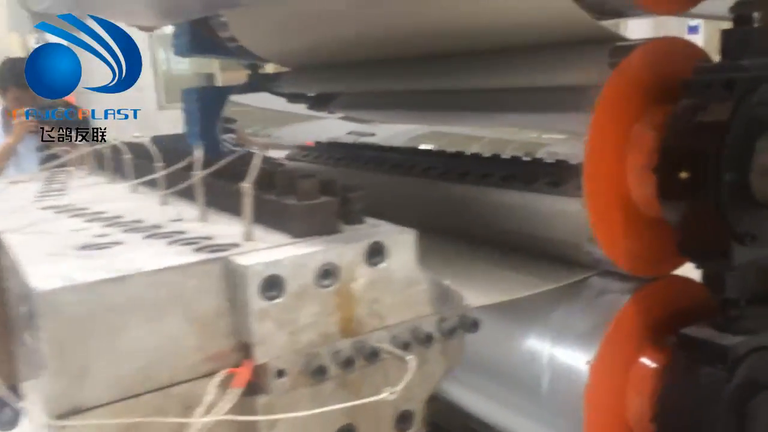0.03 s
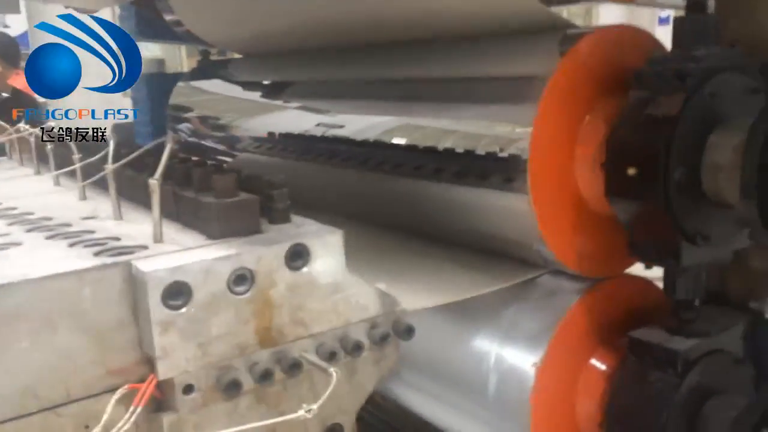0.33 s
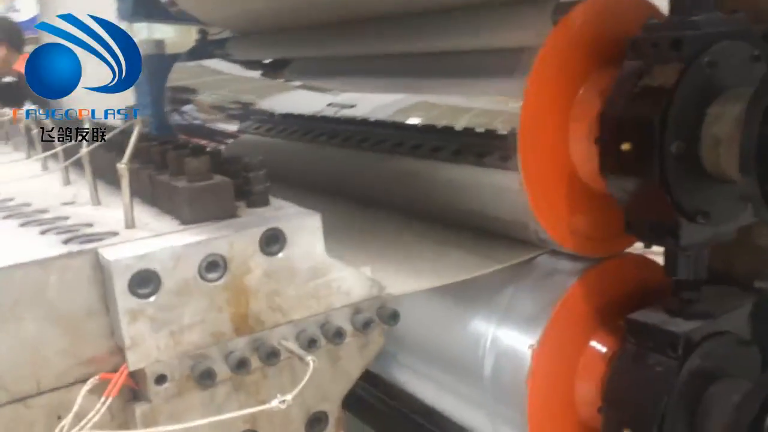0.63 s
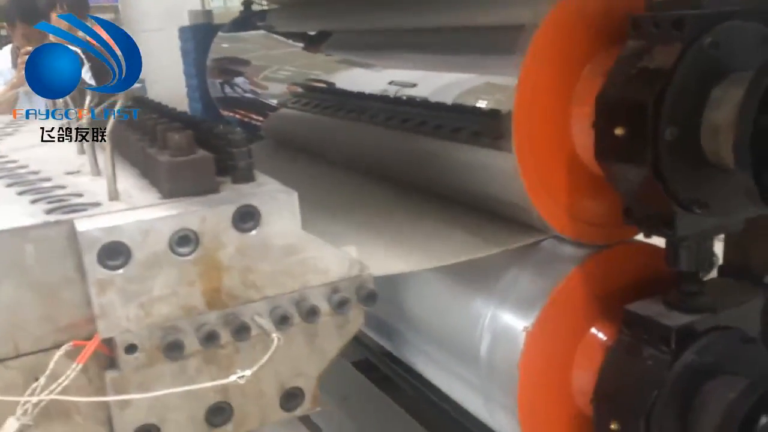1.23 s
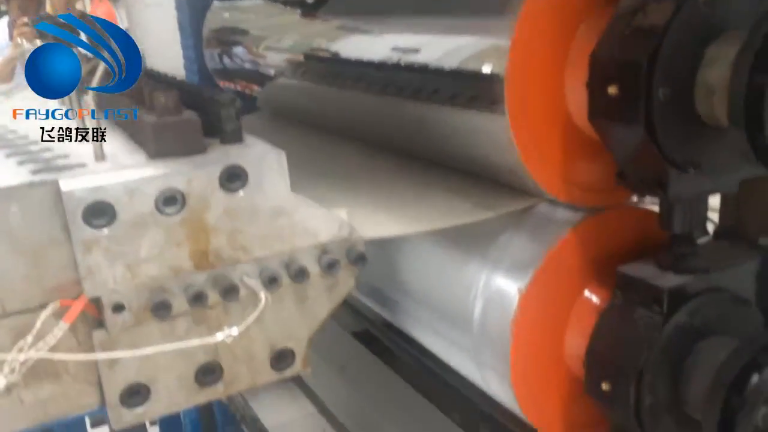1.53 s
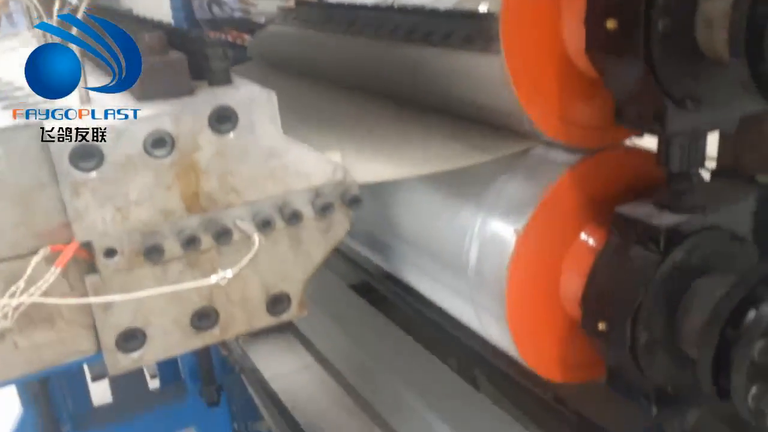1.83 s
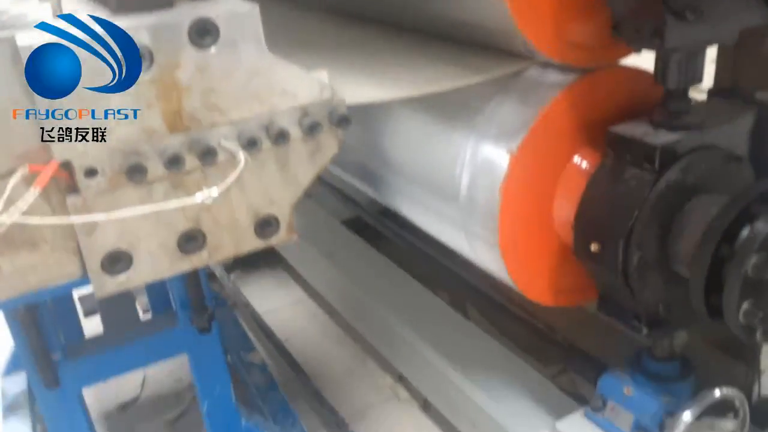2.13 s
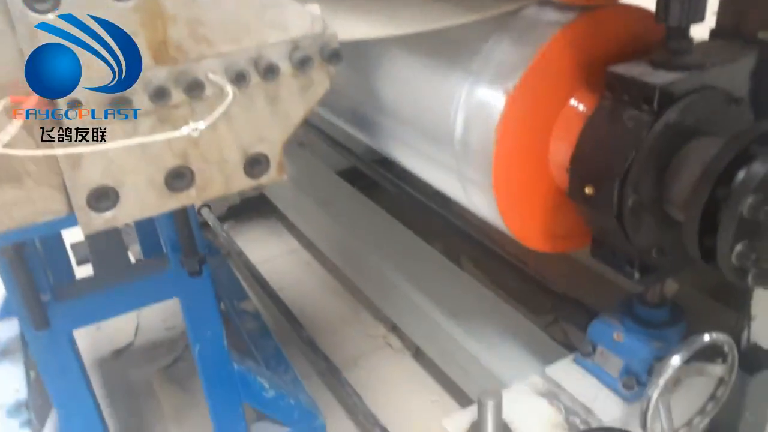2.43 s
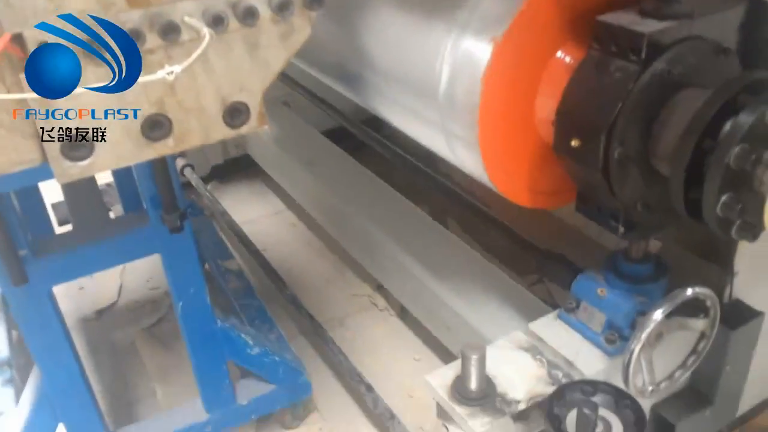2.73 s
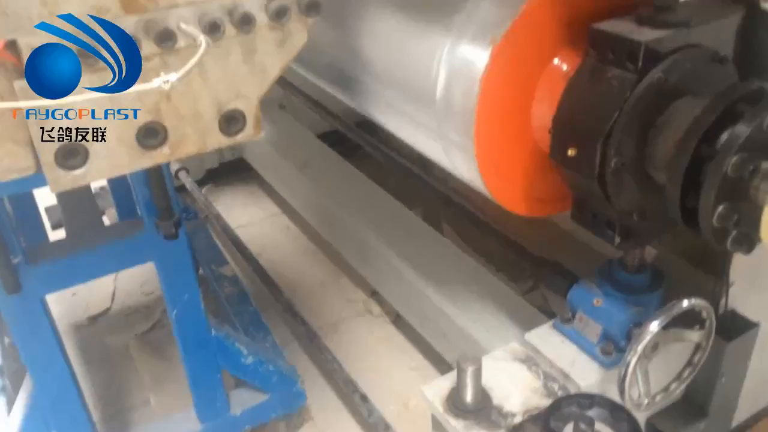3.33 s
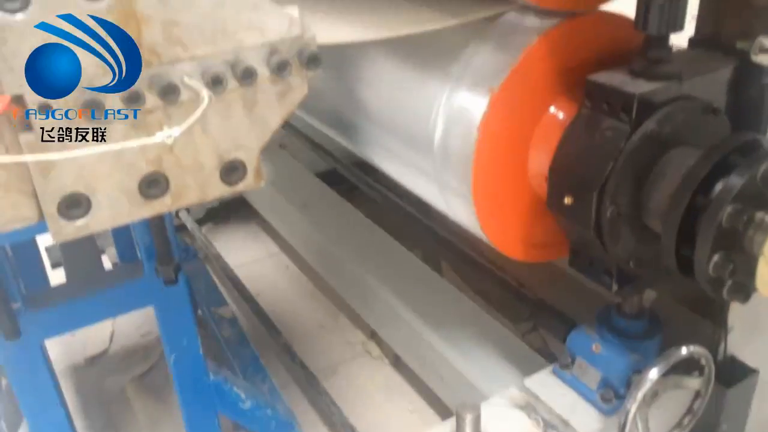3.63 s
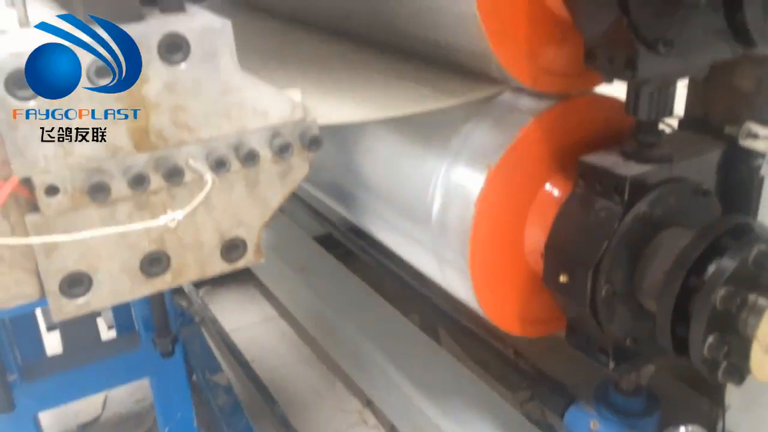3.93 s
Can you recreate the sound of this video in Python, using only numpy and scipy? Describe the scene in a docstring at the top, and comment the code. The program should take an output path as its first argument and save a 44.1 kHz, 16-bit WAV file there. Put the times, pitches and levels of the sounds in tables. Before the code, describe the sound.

Steady drone of a plastic sheet rolling machine, with whirring gears and two knocks.

```python
"""A steady factory rush with humming motors, whirring gears and a thin drive whine near 4 kHz.
It is a plastic sheet extrusion line with its fans and rolls. The microphone tilts from the roll gap
down to the frame, so hum and whirr grow and the tones swell and fade in the hall's standing waves.
Halfway through, a light clack and a harder, briefly rattling knock come from the machinery."""
import sys
import numpy as np
from scipy import signal
from scipy.fft import rfft, irfft
from scipy.io import wavfile

SR = 44100
rng = np.random.default_rng(int(sys.argv[2]) if len(sys.argv) > 2 else 0)


def master_out(mix):
    """Clip the mix to full scale and print it as 16-bit PCM to the path in sys.argv[1]."""
    frames = np.transpose(np.atleast_2d(mix))
    ceiling = np.clip(frames, -1, 1)
    pcm = np.round(ceiling * 32767).astype(np.int16)
    wavfile.write(sys.argv[1], SR, pcm)


N = 176400


def from_db(db):
    """Decibels to gain."""
    return 10 ** (np.asarray(db) / 20)


def unit_rms(x):
    """Scale to rms 1."""
    return x / np.sqrt(np.mean(x ** 2) + 1e-20)


def curve(rows):
    """Interpolate (time [s], value) rows at every sample."""
    return np.interp(np.arange(N) / SR, *np.transpose(rows))


def bell(centre_s, width_s):
    """Gaussian swell of height 1."""
    return np.exp(-((np.arange(N) / SR - centre_s) / width_s) ** 2)


def drift(rate_hz):
    """Smooth random fluctuation, rms 1."""
    hop, settle = 100, 2000
    pole = np.exp(-2 * np.pi * rate_hz * hop / SR)
    white = rng.standard_normal(N // hop + settle + 2)
    slow = signal.lfilter([1], [1, -2 * pole, pole * pole], white)[settle:]
    return np.interp(np.arange(N) / hop, np.arange(len(slow)), unit_rms(slow - slow.mean()))


def noise(spectrum, side_db=-14):
    """Coloured noise, nearly alike in both channels, rms 1."""
    hz, db = np.transpose(spectrum)
    bin_hz = np.maximum(np.arange(N // 2 + 1) * SR / N, 1)
    gain = from_db(np.interp(np.log(bin_hz), np.log(hz), db))
    gain /= np.sqrt(1 + (bin_hz / (2 * hz[-1])) ** 4)  # low-pass
    gain *= bin_hz / (bin_hz + 10)  # high-pass
    mid, side = irfft(rfft(rng.standard_normal((2, N))) * gain, N)
    return unit_rms(mid + from_db(side_db) * side * [[1], [-1]])


def tone(hz, wander_hz, fade_db, fade_hz, side_db=-33.5):
    """Wandering, fading sine plus a weak reflection that differs between channels, rms 1."""
    phase = 2 * np.pi * (np.cumsum(hz + wander_hz * drift(6.36)) / SR + rng.random())
    side = from_db(side_db) * drift(0.93) * np.cos(phase + 2 * np.pi * rng.random())
    fade = from_db(fade_db * drift(fade_hz))
    return unit_rms(fade * (np.sin(phase) + side * [[1], [-1]]))


def fans():
    """Steady broadband rush of air."""
    # rush spectrum (frequency [Hz], relative density [dB])
    spectrum = [(22, -9.5), (34, -20), (48, 1.5), (70, -6.5), (95, -6.5), (125, -3.5), (190, 1), (250, -1),
                (330, -1), (440, 1.5), (540, -5), (700, -2.5), (950, -1), (1400, -2.5), (2000, -6.5),
                (2800, -11), (3600, -11), (4450, -13), (4900, -20), (5500, -23.5), (6200, -57.5),
                (7000, -61.5)]
    return from_db(-29.5) * noise(spectrum)


def motors():
    """Shaft hum, frame rumble and blowers that beat at slightly different speeds."""
    # shaft hum (time [s], level [dB])
    shaft_level = [(0, -44), (1.2, -47), (1.7, -44.5), (2.2, -39), (4, -40)]
    # blower tones (frequency [Hz], level [dB])
    blower_tones = [(280.5, -51), (285.2, -47), (287.6, -35.4), (300, -49)]
    # frame rumble (time [s], level [dB])
    rumble_level = [(0, -32), (.12, -36), (.3, -40), (.75, -38), (1.1, -45), (1.45, -42.5), (1.8, -42),
                    (2.3, -41), (3, -40), (4, -42.5)]
    # rumble spectrum (frequency [Hz], relative density [dB])
    rumble_spectrum = [(25, -17), (60, 2.5), (120, 2.5), (200, 2), (300, -8.5), (600, -35)]
    shaft = from_db(curve(shaft_level)) * tone(hz=53.15, wander_hz=0.23, fade_db=0.8, fade_hz=4.4)
    blowers = sum(from_db(db) * tone(hz, wander_hz=0.36, fade_db=1, fade_hz=11)
                  for hz, db in blower_tones)
    rumble = from_db(curve(rumble_level)) * noise(rumble_spectrum)
    return shaft + blowers + rumble


def rolls():
    """Gear tones and bearing whirr, louder as the microphone nears the frame, under a faint hiss."""
    # roll and bearing whirr (time [s], level [dB])
    whirr_level = [(0, -35), (.6, -52), (1.1, -43), (1.6, -40), (2.05, -37), (2.5, -37.5), (2.9, -31),
                   (3.3, -30.5), (3.52, -30), (3.7, -32.5), (4, -29.5)]
    # whirr spectrum (frequency [Hz], relative density [dB])
    whirr_spectrum = [(140, -6), (300, -14), (480, -1.5), (650, -1.5), (800, 3.5), (1050, -2.5),
                      (1200, -4.5), (1400, 1.5), (1900, 0.5), (2500, -5.5), (3050, -4), (4000, -19.5),
                      (5500, -25.5), (7000, -53)]
    # gear and bearing tones (frequency [Hz], base level [dB], share of the whirr's swing [ratio])
    gear_tones = [(125.5, -46.5, .4), (338, -46.5, .3), (395.5, -49, .3), (432, -48, 0), (570, -52, .3),
                  (752, -49, .5), (788, -51, .4), (931.3, -46, .2), (974, -52, .6), (1009, -45, .7),
                  (1028, -51, .9), (1051, -51, 1.2), (1088, -50, 1), (1127, -54, .8), (1175, -51, .2),
                  (1276, -53, .7), (1294, -49, .6), (1386, -52, .9), (1650, -52, .9), (1739, -50, 0),
                  (1762.8, -51, 1.1)]
    # treble hiss (time [s], level [dB])
    hiss_level = [(0, -51.5), (.7, -78.5), (1.2, -55), (1.7, -44), (2.0, -41.5), (2.35, -62.5), (2.7, -42),
                  (3.3, -38), (3.55, -44), (4, -43)]
    # hiss spectrum (frequency [Hz], relative density [dB])
    hiss_spectrum = [(1000, -7), (3000, 0.5), (5000, 5), (6000, 2), (7000, -14)]
    whirr_db = curve(whirr_level)
    swing_db = whirr_db - whirr_db.mean()
    gears = sum(from_db(db + share * swing_db) * tone(hz, wander_hz=1.62, fade_db=3.5, fade_hz=4)
                for hz, db, share in gear_tones)
    flutter_db = 0.7 * drift(14)
    whirr = from_db(whirr_db + flutter_db) * noise(whirr_spectrum)
    hiss = from_db(curve(hiss_level)) * noise(hiss_spectrum)
    return whirr + gears + hiss


def drive():
    """Motor and switching tones; they dip and swell as the microphone crosses standing waves."""
    # strongest drive tone (time [s], level [dB])
    main_level = [(0, -44), (.09, -40), (.22, -49), (.38, -39), (.5, -39), (.62, -36), (.82, -34.3),
                  (.93, -37), (1.03, -43), (1.28, -37.8), (1.55, -39.5), (1.85, -48), (2.2, -54),
                  (2.6, -50), (4, -51)]
    # upper drive tone (time [s], level [dB])
    upper_level = [(0, -49), (.13, -46), (.27, -37), (.43, -46), (.58, -42), (.92, -43), (1.03, -53),
                   (1.22, -43), (1.9, -45), (2.25, -50), (2.9, -42.5), (3.45, -43), (4, -55)]
    # standing waves (frequency [Hz], base level [dB], node time [s], node width [s], crest time [s])
    standing_tones = [(772.5, -41.3, .7, .5, 1.1), (831, -41, .55, .45, 1.38), (893.7, -45, 3.3, .9, .65),
                      (1879.3, -44, 1.05, .6, 2.35), (3283.6, -52, 1.1, .3, 2.1),
                      (3658.7, -44, 1.3, .2, .8), (3907, -50, .45, .3, 1.3), (3943.4, -44.5, 2.1, .4, .76),
                      (3980.6, -48.5, .9, .3, 2.5), (4339, -47, 2.55, .6, 1.6),
                      (4449.2, -44.5, 1.1, .45, .48)]
    # switching sidebands (frequency [Hz], level [dB])
    sidebands = [(3328, -56), (3394, -56), (3438, -54.5), (3511.6, -55.5), (3617, -55), (3722, -56),
                 (3796, -56), (3832.7, -54.5), (4017.2, -52.5), (4375.5, -54), (4485, -55.5)]
    main_hz, upper_hz, wander_hz = 3547.8, 4053.6, 0.63
    node_db, crest_db, crest_width_s = -6, 4, 0.096
    main = tone(main_hz, wander_hz, fade_db=0.8, fade_hz=14, side_db=-27)
    upper = tone(upper_hz, wander_hz, fade_db=0.1, fade_hz=10, side_db=-16)
    out = from_db(curve(main_level)) * main + from_db(curve(upper_level)) * upper
    standing = [(hz, db + node_db * bell(node_s, width_s) + crest_db * bell(crest_s, crest_width_s))
                for hz, db, node_s, width_s, crest_s in standing_tones]
    for hz, db in standing + sidebands:
        out += from_db(db) * tone(hz, wander_hz, fade_db=1.94, fade_hz=6.6, side_db=-16)
    return out


def squeaks():
    """A bearing sings in short, faint swells of an unsteady tone."""
    # bearing squeaks (time [s], half length [s], frequency [Hz], level [dB])
    swells = [(0.767, 0.037, 1555, -36), (2.95, .1, 1048, -38.5), (3.285, 0.14, 1055, -33.5),
              (3.4, 0.036, 1350, -37)]
    return sum(from_db(db) * bell(time_s, width_s) * tone(hz, wander_hz=5, fade_db=1.5, fade_hz=20)
               for time_s, width_s, hz, db in swells)


def knocks():
    """Each contact cracks, rings the part's modes near its own pitch and leaves a tail in the hall."""
    # clack, knock and rattle (time [s], ring gain [dB], force centre [Hz], crack gain [dB])
    contacts = [(1.5443, -16.5, 2900, -20), (1.8822, -19.5, 900, -33), (1.8840, -14.5, 1400, -15.5),
                (1.8872, -21, 1100, -23), (1.8965, -35, 3000, -32), (1.9025, -35, 3000, -31),
                (1.9245, -29, 1100, -40), (1.9325, -26, 900, -38), (1.943, -29, 1200, -42),
                (1.987, -29, 1300, -42), (2.055, -26, 850, -48)]
    # modes of the struck part (frequency [Hz], relative level [dB], T60 [s])
    modes = [(945, -12, .08), (1054, 0, .065), (1211, -1, .055), (1790, -10, .04), (1990, -9, .05),
             (2120, -9, .035), (2400, -3, .04), (2675, -9, .07), (3720, -14, .04), (4450, -12, .035),
             (5243, -12, .04), (5800, -9, .03)]
    # crack spectrum (frequency [Hz], relative density [dB])
    crack_spectrum = [(100, -18), (500, -24), (1000, -13), (2400, 7.5), (3100, 1), (4500, 1), (6800, -1.5)]
    force_width_oct, crack_t60_s = 0.85, 0.034
    hall_t60_s, ring_tail_db, crack_tail_db = 0.42, -15.5, -17
    out = np.zeros((2, N))
    crack_noise = noise(crack_spectrum)
    age_s = np.arange(SR // 2) / SR
    tail = from_db(-60 * age_s / hall_t60_s)
    for time_s, ring_db, centre_hz, crack_db in contacts:
        span = slice(int(time_s * SR), int(time_s * SR) + len(age_s))
        for hz, mode_db, t60_s in modes:
            force = 1 / (1 + (np.log2(hz / centre_hz) / force_width_oct) ** 4)
            ring_tail = from_db(ring_tail_db) * tail * drift(51)[span]
            envelope = from_db(-60 * age_s / t60_s) + ring_tail
            out[:, span] += force * from_db(ring_db + mode_db) * envelope * np.sin(2 * np.pi * hz * age_s)
        envelope = from_db(-60 * age_s / crack_t60_s) + from_db(crack_tail_db) * tail
        crack = from_db(crack_db) * envelope * crack_noise[:, span]
        bass_cut = signal.butter(2, centre_hz / 2, "high", fs=SR, output="sos")
        out[:, span] += signal.sosfilt(bass_cut, crack)  # light contacts lack bass
    return out


def scene():
    """All sources, slightly to the right."""
    balance = from_db([[-0.24], [0.24]])
    return (fans() + motors() + rolls() + drive() + squeaks() + knocks()) * balance


def record(dry):
    """Steep elliptic low-pass."""
    cutoff_hz = 6920
    return signal.sosfilt(signal.ellip(12, 0.1, 90, cutoff_hz, fs=SR, output="sos"), dry)


dry = scene()
out = record(dry)
master_out(out)
```